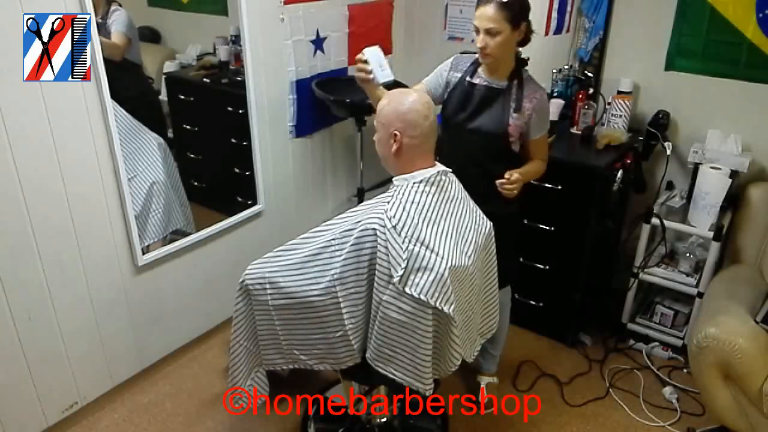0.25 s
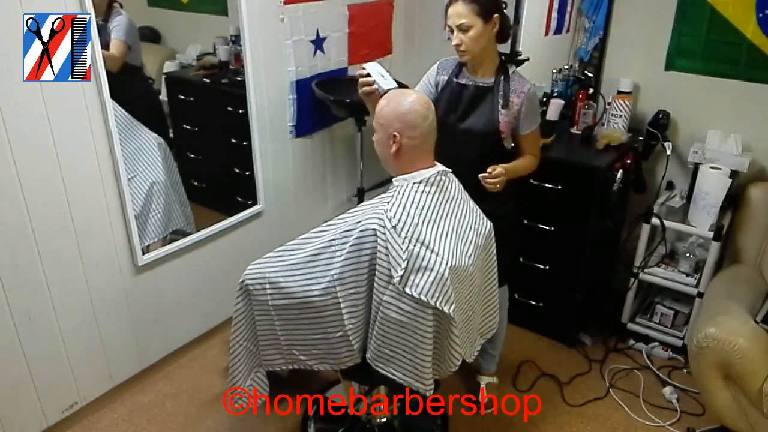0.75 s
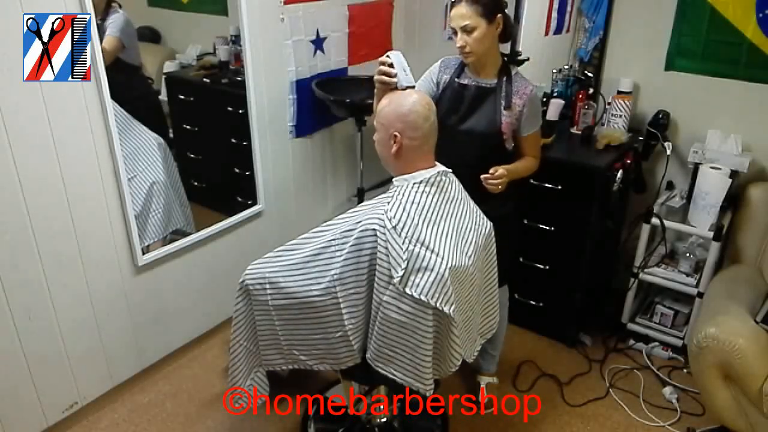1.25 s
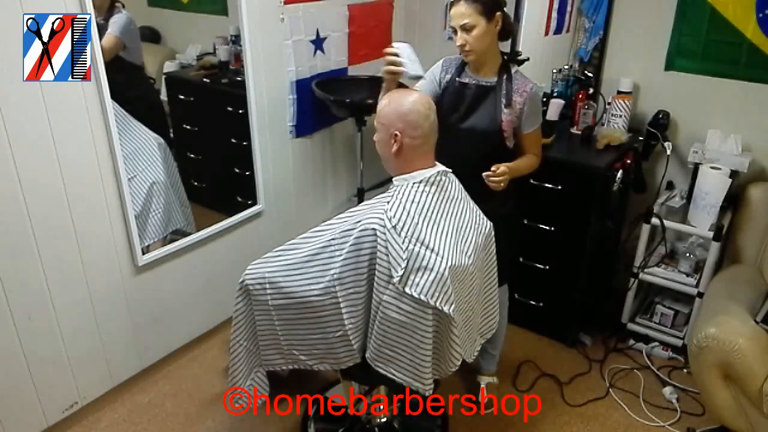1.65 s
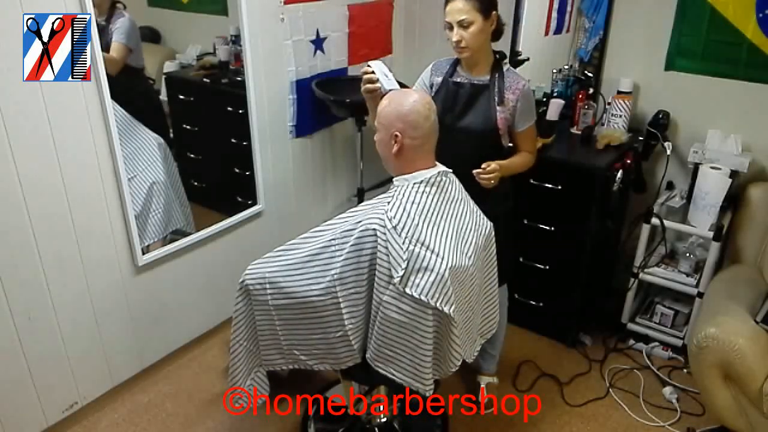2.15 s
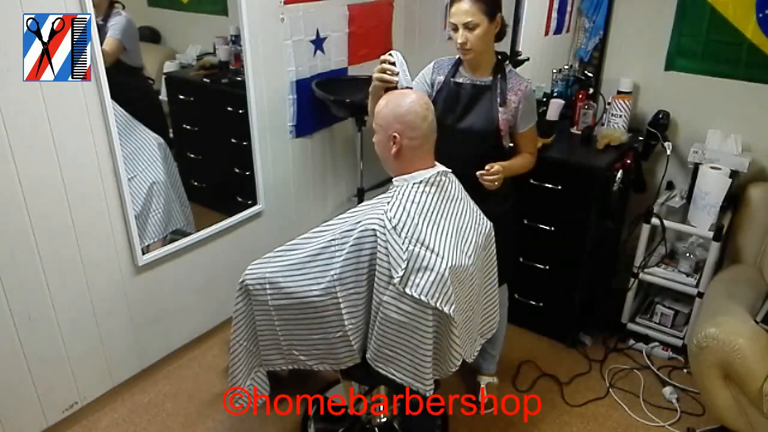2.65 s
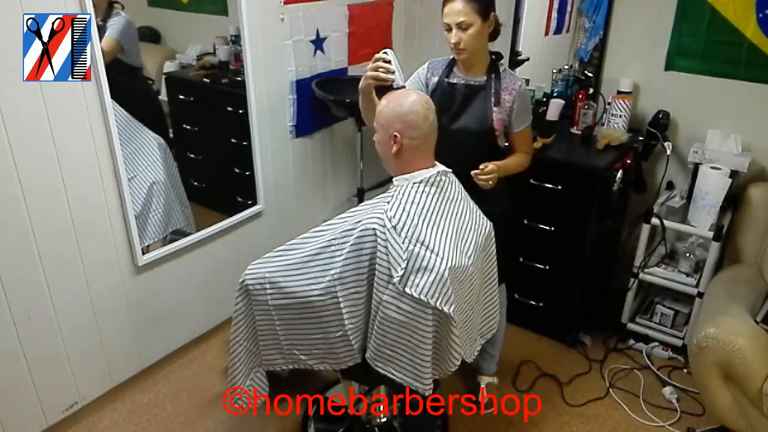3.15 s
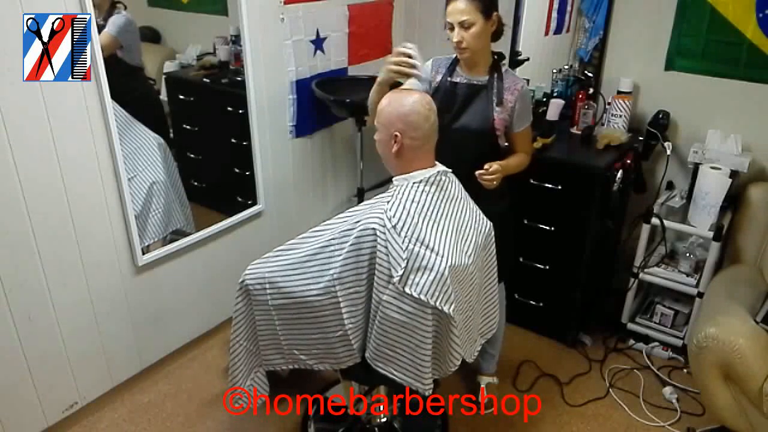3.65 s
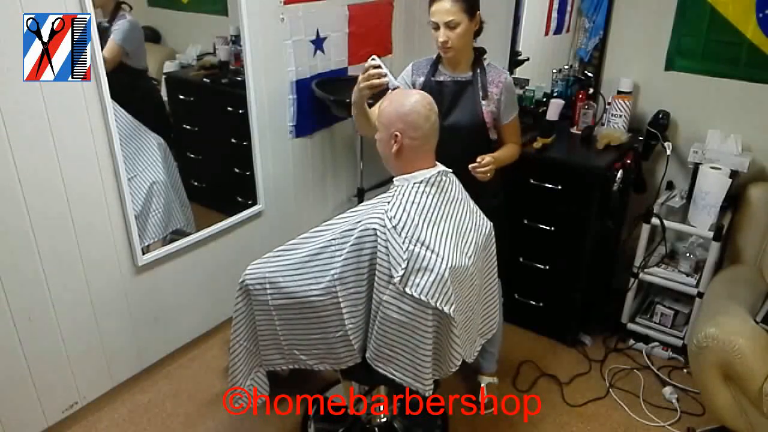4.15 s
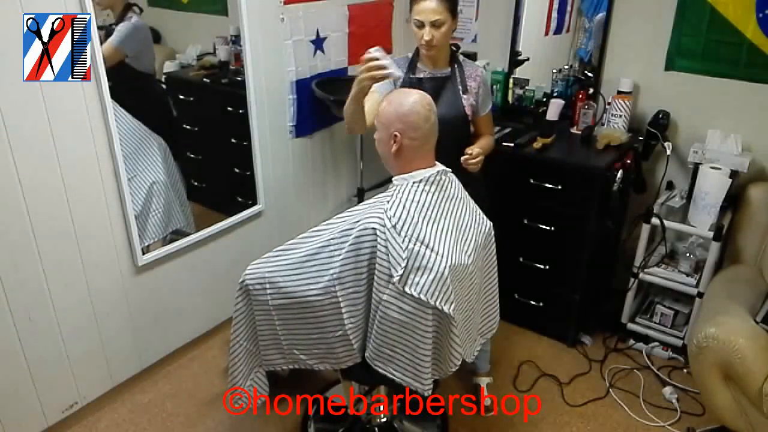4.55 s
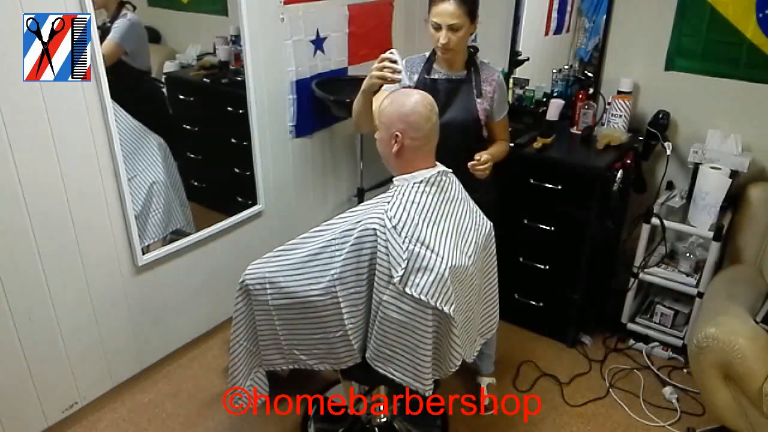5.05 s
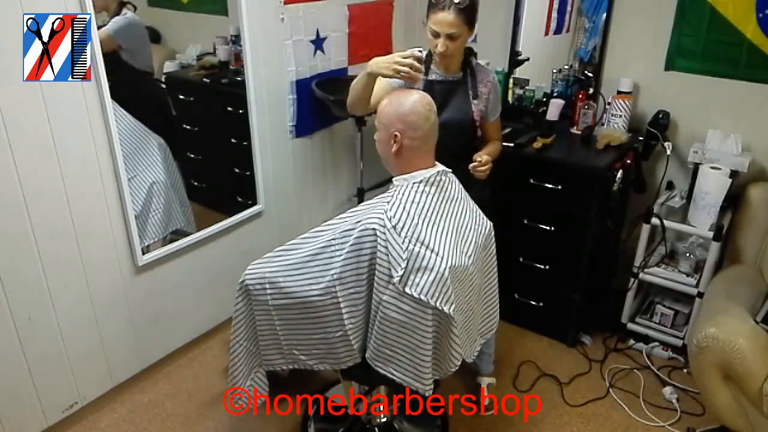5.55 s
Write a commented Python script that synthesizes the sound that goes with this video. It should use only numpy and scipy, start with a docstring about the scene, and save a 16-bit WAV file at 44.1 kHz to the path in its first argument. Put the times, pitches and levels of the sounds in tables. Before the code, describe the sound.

A thin, bright electric shaver buzz wavers and rasps as it strokes a scalp indoors; brief scrapes and soft knocks come towards the end.

```python
"""An electric foil shaver is stroked over a scalp in a small room, a couple of metres from the microphones.
In the air its cutter buzzes as a stack of clean harmonics; on the skin the motor sags, the strokes turn
uneven, stubble rasps as noise gated by each stroke, and the foil rings in blurred harmonics.
Nearby, filtered noise makes brushing sounds and damped resonances make a few dull knocks to the right.
Underneath lie low room rumble and a faint mains hum of steady sines."""
import sys
import numpy as np
from scipy import signal
from scipy.fft import rfft, irfft, next_fast_len
from scipy.io import wavfile

SR = 44100
rng = np.random.default_rng(int(sys.argv[2]) if len(sys.argv) > 2 else 0)


def file_out(sig):
    """Save sig as 16-bit WAV at sys.argv[1]."""
    # one column per channel
    cols = np.atleast_2d(sig).T
    # limit, then scale
    lim = np.clip(cols, -1, 1)
    pcm = np.round(lim * 32767).astype(np.int16)
    wavfile.write(sys.argv[1], SR, pcm)


N = 256617

# motor speed before its small wow: (time [s], cutter strokes per second [Hz])
MOTOR_SPEED = [(0.01, 307.7), (0.1, 306.7), (0.2, 315.7), (0.3, 318.1), (0.44, 318.3), (0.57, 315.3),
               (0.63, 315.7), (0.72, 303.2), (0.84, 308.1), (0.92, 306.7), (0.96, 303.5), (1.02, 303.4),
               (1.11, 297.7), (1.21, 298.8), (1.24, 296.2), (1.32, 297.2), (1.38, 294.1), (1.44, 299.7),
               (1.48, 296.4), (1.66, 301.5), (1.72, 312.9), (1.84, 315.7), (2.07, 316.0), (2.14, 313.0),
               (2.23, 313.5), (2.32, 307.9), (2.47, 304.2), (2.57, 303.4), (2.63, 306.3), (2.71, 303.6),
               (2.77, 308.6), (2.9, 305.5), (2.95, 299.7), (3.0, 301.5), (3.08, 313.9), (3.11, 313.8),
               (3.19, 303.9), (3.26, 300.3), (3.4, 308.6), (3.53, 309.7), (3.6, 305.0), (3.65, 305.1),
               (3.69, 311.5), (3.74, 314.0), (3.93, 316.2), (4.06, 313.4), (4.12, 307.0), (4.27, 307.5),
               (4.38, 309.8), (4.55, 308.3), (4.69, 314.9), (4.82, 316.5), (4.94, 302.8), (4.99, 306.8),
               (5.03, 305.3), (5.14, 310.0), (5.23, 306.4), (5.29, 312.5), (5.41, 314.0), (5.44, 309.9),
               (5.57, 311.8), (5.64, 306.7), (5.72, 310.7), (5.81, 312.5)]
# relative strength of the cutter's harmonics: (frequency [Hz], level [dB])
BUZZ_COLOUR = [(1200, -8), (1550, -21), (2200, -18.5), (3100, -12), (4000, -16), (6000, -13), (8400, -12),
               (9300, -15.5), (10500, -26), (12800, -12), (13800, -13), (15500, -16)]
# housing resonances that the harmonics slide through: (centre [Hz], width [Hz], lift [dB])
HOUSING_MODES = [(1576, 33, 9), (1900, 100, 3), (2236, 166, 8), (2856, 7.7, 6), (3332, 100, 7),
                 (3774, 53, 9.5), (4286, 520, 6), (4883, 106, 7), (5554, 61, 9)]
# relative strength of the foil's whine: (frequency [Hz], level [dB])
WHINE_COLOUR = [(6000, -35), (6600, -14.5), (7050, 2.5), (7280, -5), (7540, 1.5), (7900, -16), (8400, -51),
                (9000, -27)]
# level of the foil's whine, before its colour: (time [s], level [dB])
WHINE_LEVEL = [(0.0, -58), (0.03, -51), (0.18, -32.5), (0.24, -47), (0.83, -40.5), (1.55, -43),
               (1.73, -43.5), (3.48, -37), (3.91, -51), (3.99, -31.5), (4.42, -48), (4.5, -37), (4.81, -38),
               (4.85, -33.5), (5.04, -35.5), (5.82, -36.5)]
# strokes over the scalp, levels at the usual drag and before the foil's trim:
# (touch [s], lift [s], foil ringing [dB], low thrum [dB])
SCALP_STROKES = [(-.1, 0.136, -45.5, -62), (0.455, 1.71, -48.5, -57), (1.933, 3.01, -47.5, -56.5),
                 (3.09, 3.708, -51, -60), (3.913, 4.547, -43.5, -63.5), (4.793, 5.214, -52, -60.5),
                 (5.4, 5.902, -50, -83)]
# other harmonics that stand out, one row each: (light drag [dB], usual drag [dB], heaviest drag [dB])
LEADING_LEVELS = [(-64, -67, -61), (-48, -42.5, -47), (-42, -46, -51)]
# the eighth harmonic, which sings out and fades again, before its trim: (time [s], level [dB])
SINGING_LEVEL = [(0.01, -47.0), (0.05, -39), (0.2, -52), (0.29, -36), (0.32, -47.5), (0.94, -46),
                 (1.07, -50), (1.19, -49), (1.3, -61.5), (1.36, -51.5), (1.56, -56), (1.74, -43),
                 (1.81, -57.5), (2.1, -48), (2.24, -54), (2.32, -41.5), (2.46, -53), (2.63, -47),
                 (2.97, -52), (3.26, -49.0), (3.37, -39.0), (3.61, -49), (4.08, -47), (4.11, -42.0),
                 (4.35, -54.5), (4.48, -50), (4.64, -52), (4.71, -44), (5.11, -48.5), (5.15, -55),
                 (5.24, -49.0), (5.46, -59), (5.64, -41), (5.8, -54)]
# grip and angle let a resonance ring out on the nearest harmonic:
# (start [s], end [s], frequency [Hz], level [dB])
PASSING_RINGS = [(0.463, .65, 5360, -37), (0.758, 0.918, 7060, -31.5), (1.777, 2.077, 5370, -38.5),
                 (2.1, 2.294, 5010, -35), (2.387, 2.68, 4270, -40), (3.352, 3.52, 4320, -42),
                 (3.37, 3.582, 4940, -39.5), (3.843, 4.05, 5360, -36), (4.305, 4.496, 4320, -44),
                 (4.67, 4.84, 5360, -38.5), (5.004, 5.098, 3370, -37), (5.075, 5.23, 3090, -40.5)]
# colour of stubble being cut: (frequency [Hz], relative density [dB per Hz])
RASP_COLOUR = [(500, -29), (900, -27), (1300, -16.5), (1900, -8.5), (2500, -3), (3400, 1), (4500, 0.5),
               (6200, 1.5), (8200, 0.5), (10500, -4.5), (13000, 0), (15500, -5)]
# loudness of the stubble, before its trim: (time [s], rasp [dB], part below about 5 kHz against that [dB])
RASP_LEVEL = [(0.01, -42, -6), (0.12, -43, 0.5), (0.2, -47.5, -9.0), (0.23, -53.5, 3.0), (0.43, -50, -3),
              (0.47, -50, 3), (0.58, -53, 0), (0.74, -42, -1.5), (0.81, -45.5, -11.5), (0.92, -43.0, -2.5),
              (1.57, -42.5, 2), (1.66, -45.5, 3.5), (1.76, -53.5, 3), (1.92, -61, 7), (1.99, -49, 1),
              (2.1, -45.5, -5.5), (2.23, -43.5, -6), (2.37, -45, -2.5), (2.57, -44, -2), (2.77, -46.5, 3),
              (2.99, -43, -3.0), (3.04, -47, -3), (3.1, -48, -2), (3.13, -42.5, -5), (3.68, -45.5, 1),
              (3.71, -40, 3), (3.77, -56, 10), (3.8, -45.5, 7.5), (3.91, -54, 0.5), (3.95, -49.5, -8),
              (4.08, -43, -1.5), (4.35, -44.5, -4), (4.42, -46.5, -1), (4.53, -42, -1.5), (4.64, -54, -5),
              (4.71, -52.5, 2), (4.77, -50.5, 10.5), (4.86, -42.5, 2.5), (5.11, -45, -3.5),
              (5.24, -47.5, 2), (5.31, -47, -9), (5.4, -53, 8), (5.44, -44.5, -1.5), (5.8, -47.5, 0.5)]
# where the shaver lies between the sides: (frequency [Hz], left minus right [dB])
SHAVER_BALANCE = [(900, -5), (1250, 1), (1600, 7), (2100, -1), (3300, 7), (5500, 10), (7200, 2),
                  (9000, -2.5), (11000, -4.5), (13000, -14), (15500, -16)]
# colour of the room background: (frequency [Hz], relative density [dB per Hz])
ROOM_COLOUR = [(25, -12), (55, -15), (85, -12), (120, -6.5), (165, 4), (240, -7.5), (400, -10.5),
               (600, -9.5), (850, -19.5), (2000, -21)]
# mains hum: (frequency [Hz], rms level [dB])
MAINS_HUM = [(100, -80), (200, -69), (400, -78)]
# brushes and scrapes; the length runs from the peak to 1/e^2 of it:
# (peak time [s], rms level at the peak [dB], length [s], centre [Hz], width [octaves])
BRUSH_STROKES = [(0.26, -63.5, 0.14, 176, 0.48), (0.616, -58, 0.03, 180, 0.33),
                 (2.436, -56.5, 0.037, 165, 0.39), (3.13, -59, 0.03, 169, 0.63),
                 (1.68, -56.5, 0.088, 181, 0.45), (2.53, -57.5, 0.021, 1130, 0.21),
                 (3.452, -55.5, 0.024, 457, 0.45), (3.707, -46, 0.022, 700, 4.6),
                 (3.716, -32.5, 0.028, 3770, 0.31), (3.831, -50, 0.023, 900, 2.4),
                 (4.818, -42.5, 0.053, 2820, 5.4), (4.898, -46.5, 0.085, 1900, 7),
                 (5.037, -48, 0.058, 189, 0.73)]
# dull knocks: (time [s], strength [dB], contact cut-off, lower is softer [Hz])
KNOCK_BLOWS = [(3.442, -55, 900), (3.730, -20.5, 150), (3.743, -21, 153), (4.063, -53.5, 600),
               (4.994, -35, 182), (5.010, -32, 237), (5.034, -38, 190), (5.074, -47, 318),
               (5.149, -29, 503), (5.155, -24, 770), (5.169, -27.5, 654), (5.187, -33.5, 450),
               (5.255, -45, 220), (5.309, -44, 800), (5.322, -36, 472), (5.333, -42, 420),
               (5.514, -34.5, 127)]
# resonances of what is knocked: (frequency [Hz], relative level [dB], decay by 60 dB [s])
KNOCK_MODES = [(124, -21, 0.062), (138, -25, 0.1), (216, -14.5, 0.093), (255, -25, 0.042),
               (298, -2.5, 0.085), (379, -17.5, 0.12), (420, -11, 0.083), (479, -2.5, 0.077),
               (532, -12, 0.09), (643, -14, 0.063), (1038, -12, 0.061)]

HOP = 32   # samples between control ticks
TIME = np.arange(N) / SR
TICKS = np.arange(0, N + HOP, HOP) / SR
FREE_HZ, FULL_SAG_HZ = 319.3, 20.5   # motor speed with no drag, and its drop under the heaviest drag
LIGHT_LOAD, USUAL_LOAD = 0.18, 0.47   # drag when the foil barely touches, and usual drag, out of 1
TOUCH_S, LIFT_S = 0.012, 0.095   # the foil meets the skin quickly and peels off more slowly
AIR_RING_DB, AIR_THRUM_DB = -56, -74   # with no hair in the foil; the ringing is before the foil's trim
BUZZ_DB, BUZZ_PER_LOAD_DB = -35, -2   # drag damps the housing's buzz
THRUM_ORDER, SINGING_ORDER = 3, 8   # the lowest harmonic that is heard, and the one that sings out
LEADING_HARMONICS = (4, 13, 17)
SINGING_TRIM_DB = 5
RING_FADE_S = 0.03   # a passing ring swells and dies over this time
FOIL_HZ, FOIL_WIDTH_HZ = 7320, 800
ROOM_T60_S = 0.28


def from_db(db):
    """Decibels to gain."""
    return 10 ** (np.asarray(db) / 20)


def rms_one(x):
    """Scale to unit rms."""
    return x / np.sqrt(np.mean(np.abs(x) ** 2) + 1e-20)


def in_time(rows):
    """The columns of a curve at the control ticks."""
    s, *columns = np.transpose(rows)
    return [np.interp(TICKS, s, c) for c in columns]


def per_sample(control):
    """A control at every sample."""
    return np.interp(TIME, TICKS, control)


def at_hz(points, hz):
    """Read a spectrum on a log-frequency axis."""
    f, value = np.transpose(points)
    return np.interp(np.log(np.maximum(hz, 1)), np.log(f), value)


def drift(rate_hz):
    """Smooth chance at the control ticks, rms 1: white noise through two equal one-pole low-passes."""
    r = np.exp(-2 * np.pi * rate_hz * HOP / SR)
    white = rng.standard_normal(2 * len(TICKS))
    smooth = signal.lfilter([1], [1, -2 * r, r * r], white)
    return rms_one(smooth[len(TICKS):])   # the filter has settled by here


def bump(hz, centre_hz, width_hz):
    """Power response of a resonance, 1 on top."""
    return 1 / (1 + (2 * (hz - centre_hz) / width_hz) ** 2)


def placed(hz):
    """Left and right gains of the shaver, at constant power."""
    lean = from_db(np.array([[1], [-1]]) * at_hz(SHAVER_BALANCE, hz) / 2)
    return lean / np.sqrt(np.mean(lean ** 2, axis=0))


def noise(colour, alike):
    """Stereo noise of rms 1 with gain colour(Hz) and a given left-right likeness."""
    size = next_fast_len(N)
    mid, side = rng.standard_normal((2, size))
    pair = np.sqrt(1 + alike) * mid + np.sqrt(1 - alike) * side * np.array([[1], [-1]])
    hz = np.arange(size // 2 + 1) * SR / size
    return rms_one(irfft(rfft(pair) * colour(hz), size)[:, :N])


def random_path(rate_hz):
    """A complex gain of rms 1 that wanders in height and phase."""
    return rms_one(drift(rate_hz) + 1j * drift(rate_hz))


def room(x, count=8):
    """Echoes circling between the walls, on different paths for each side."""
    out = np.zeros((2, N))
    lags = (rng.uniform(0.0061, 0.04, 2 * count) * SR).astype(int)
    for k, lag in enumerate(lags):
        loop = x.copy()
        gain = from_db(-60 * lag / SR / ROOM_T60_S)
        for i in range(lag, N, lag):
            loop[i:i + lag] += gain * loop[i - lag:i][:N - i]
        out[k % 2] += (loop - x) * (-1) ** (k // 2)
    return out / np.sqrt(count)


def on_skin(touch_s, lift_s):
    """Contact during one stroke, 0-1: attack, hold, release."""
    attack = np.clip((TICKS - touch_s) / TOUCH_S, 0, 1)
    release = np.clip(1 - (TICKS - lift_s) / LIFT_S, 0, 1)
    return attack * release


def shaving(load):
    """Levels (dB) of foil ringing and thrum: each stroke adds its share to the free-running sound."""
    ringing, thrum = sum(np.outer(from_db(levels_db), on_skin(touch_s, lift_s))
                         for touch_s, lift_s, *levels_db in SCALP_STROKES)
    thrum = thrum * np.minimum(load / USUAL_LOAD, 1)
    in_air = from_db([[AIR_RING_DB], [AIR_THRUM_DB]])
    return 20 * np.log10(np.hypot(in_air, [ringing, thrum]))


def ringing_out(k, speed):
    """Level that the passing resonances add to harmonic k."""
    level = 0
    for start, end, hz, db in PASSING_RINGS:
        nearest = round(hz / np.interp((start + end) / 2, TICKS, speed))
        if nearest == k:
            from_edge = np.minimum(TICKS - start, end - TICKS)
            level = level + from_db(db) * np.clip(from_edge / RING_FADE_S + 0.5, 0, 1)
    return level


def cutter(speed, cutting, buzz_db, whine_db, leading, free_jitter=0.00051, loaded_jitter=0.0033,
           wow=0.0004, echo_share=0.48, leading_echo_share=0.28, hand_rate_hz=4.15,
           flutter_db=2.0, spread=1.31, count=51):
    """Harmonics of the cutter's stroke; drag makes the strokes uneven in time and force."""
    # in cycles: smears the high harmonics first
    jitter = (free_jitter + loaded_jitter * cutting) * drift(240)
    turns = np.cumsum(per_sample(speed * (1 + wow * drift(15.5)))) / SR + per_sample(jitter)
    out = np.zeros((2, N))
    for k in range(THRUM_ORDER, count):   # the housing is too small to radiate the lowest two
        hz = k * speed
        partial = np.exp(2j * np.pi * k * turns)
        if k in leading:
            level, wet = from_db(leading[k]), leading_echo_share
        else:
            lift_db = sum(db * bump(hz, centre, width) for centre, width, db in HOUSING_MODES)
            buzz = from_db(buzz_db + at_hz(BUZZ_COLOUR, hz) + lift_db)
            whine = from_db(whine_db + at_hz(WHINE_COLOUR, hz))
            level, wet = np.hypot(buzz, whine), echo_share
        # the skin drags unevenly
        flutter = rms_one(from_db(flutter_db * (0.5 + cutting) * drift(40.5)))
        level = np.hypot(level, ringing_out(k, speed)) * flutter
        start = rng.uniform(0, 2 * np.pi)
        for side, gain in enumerate(level * placed(hz)):
            # wall echoes add to each harmonic with a phase that shifts as the hand moves
            echoes = random_path(hand_rate_hz)
            direct = np.exp(1j * (start + rng.normal(0, spread * np.sqrt(wet))))
            path = rms_one(np.sqrt(1 - wet) * direct + np.sqrt(wet) * echoes)
            out[side] += (per_sample(gain * path) * partial).real
    return out, turns


def stubble(turns, rasp_db, lower_db, trim_db=8.5, grain_db=1.5, patchy_db=1.5, gating=0.27,
            edge_hz=4800, count=24):
    """Hairs are snipped in uneven clumps on each stroke; the colour shifts as the head tilts."""
    size = next_fast_len(N)
    rasp = rfft(noise(lambda hz: from_db(at_hz(RASP_COLOUR, hz)) * placed(hz), alike=0.035), size)
    hz = np.arange(rasp.shape[1]) * SR / size
    centres = np.geomspace(1000, 14500, count)
    out = np.zeros((2, N))
    for centre, share in zip(centres, np.eye(count)):   # overlapping triangular bands
        band = irfft(rasp * np.interp(hz, centres, share), size)[:, :N]
        press_db = lower_db / (1 + (centre / edge_hz) ** 8)   # firm contact fills the valleys
        patches = rms_one(from_db(patchy_db * drift(28)))
        out += band * per_sample(patches * from_db(press_db))
    snips = 1 + gating * np.cos(2 * np.pi * turns)
    return out * snips * per_sample(from_db(rasp_db + trim_db + grain_db * drift(190)))


def foil(speed, turns, ring_db, trim_db=3.5, flutter_rate_hz=55):
    """Cut hairs kick the foil once a stroke with random force: it rings in blurred harmonics."""
    out = np.zeros((2, N))
    for k in range(20, 28):   # the harmonics around the foil's resonance
        hz = k * speed
        partial = np.exp(2j * np.pi * k * turns)
        level = from_db(ring_db + trim_db) * bump(hz, FOIL_HZ, FOIL_WIDTH_HZ)
        for side, gain in enumerate(level * placed(hz)):
            kicks = random_path(flutter_rate_hz)
            out[side] += (per_sample(gain * kicks) * partial).real
    return out


def background(level_db=-67, swell_db=3.0):
    """Low room rumble, nearly alike on both sides and slowly swelling, and steady sines of mains hum."""
    rumble = noise(lambda hz: from_db(at_hz(ROOM_COLOUR, hz)), alike=0.94)
    swell = per_sample(from_db(level_db + swell_db * drift(13.3)))
    hum = sum(np.sqrt(2) * from_db(db) * np.sin(2 * np.pi * (hz * TIME + rng.random()))
              for hz, db in MAINS_HUM)
    return rumble * swell + hum


def brushes(wet_db=-10):
    """Short swells of friction noise, with echoes off the walls."""
    out = np.zeros(N)
    for s, db, length, hz, octaves in BRUSH_STROKES:
        edges = hz * 2 ** (octaves * np.array([-0.5, 0.5]))
        band = signal.butter(2, edges, "band", fs=SR, output="sos")
        rub = signal.sosfilt(band, rng.standard_normal(N))
        out += from_db(db) * rms_one(rub) * np.exp(-2 * ((TIME - s) / length) ** 2)
    return out + from_db(wet_db) * room(out)


def ring(clicks, hz, t60):
    """A two-pole resonator: a unit click sets a decaying sine of starting height 1 ringing."""
    r, w = from_db(-60 / (t60 * SR)), 2 * np.pi * hz / SR
    return signal.lfilter([0, np.sin(w)], [1, -2 * r * np.cos(w), r * r], clicks + 1e-18)


def knocks(wet_db=-15, radiating_hz=122, lag_s=0.00031):
    """Soft blows on a heavy, well-damped body that radiates little deep bass, off to the right."""
    force = np.zeros(N)
    for s, db, soft_hz in KNOCK_BLOWS:
        blow = np.zeros(N)
        blow[round(s * SR)] = from_db(db)
        contact = signal.butter(3, soft_hz, fs=SR, output="sos")
        force += signal.sosfilt(contact, blow + 1e-18)
    body = sum(ring(force, hz, t60) * from_db(db) for hz, db, t60 in KNOCK_MODES)
    body = signal.sosfilt(signal.butter(6, radiating_hz, "high", fs=SR, output="sos"), body)
    direct = np.array([np.interp(TIME - lag_s, TIME, body), body])   # the left side hears it later
    return direct + from_db(wet_db) * room(body)


def scene():
    """The shaver, the room, the brushes and the knocks."""
    speed, = in_time(MOTOR_SPEED)
    whine_db, = in_time(WHINE_LEVEL)
    singing_db, = in_time(SINGING_LEVEL)
    rasp_db, lower_db = in_time(RASP_LEVEL)
    load = np.clip((FREE_HZ - speed) / FULL_SAG_HZ, 0, 1)   # drag shows in the motor's sag
    ring_db, thrum_db = shaving(load)
    cutting = from_db(rasp_db - rasp_db.max())   # 1 at the loudest rasp
    leading = {k: np.interp(load, [LIGHT_LOAD, USUAL_LOAD, 1], levels_db)
               for k, levels_db in zip(LEADING_HARMONICS, LEADING_LEVELS)}
    leading[THRUM_ORDER] = thrum_db   # it thrums against the skin
    leading[SINGING_ORDER] = singing_db + SINGING_TRIM_DB
    buzz, turns = cutter(speed, cutting, BUZZ_DB + BUZZ_PER_LOAD_DB * load, whine_db, leading)
    shaver = buzz + stubble(turns, rasp_db, lower_db) + foil(speed, turns, ring_db)
    return shaver + background() + brushes() + knocks()


def record(dry):
    """The top is cut steeply above 15.85 kHz by an elliptic low-pass."""
    low_pass = signal.ellip(12, 0.2, 85, 15850, fs=SR, output="sos")
    return signal.sosfilt(low_pass, dry)


dry = scene()
out = record(dry)
file_out(out)
```